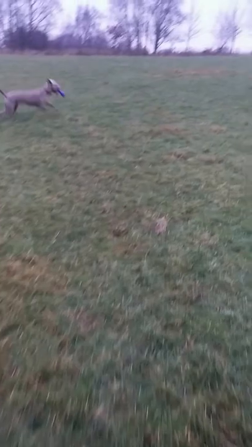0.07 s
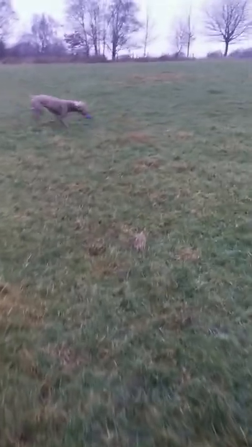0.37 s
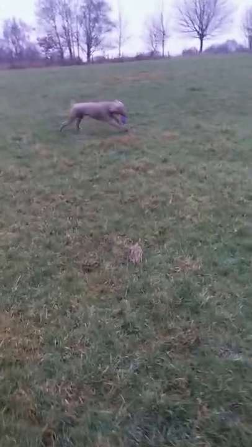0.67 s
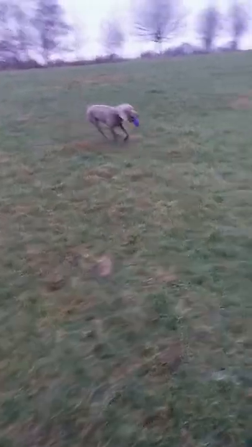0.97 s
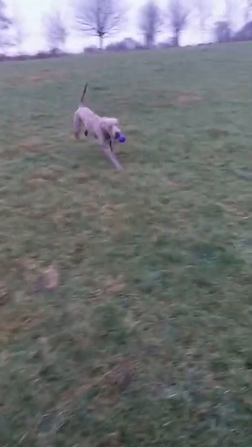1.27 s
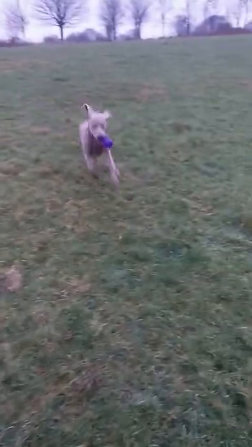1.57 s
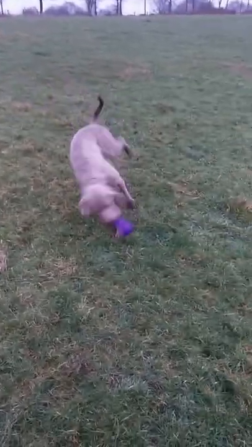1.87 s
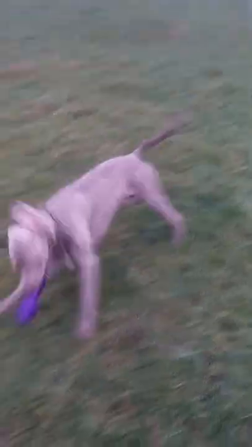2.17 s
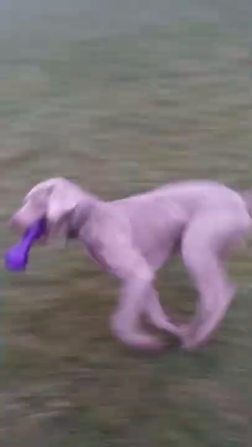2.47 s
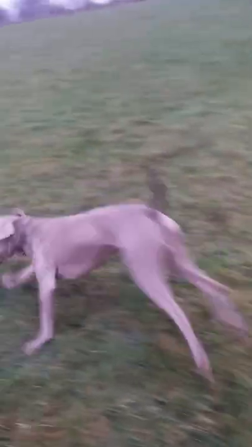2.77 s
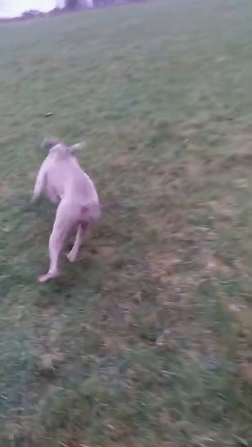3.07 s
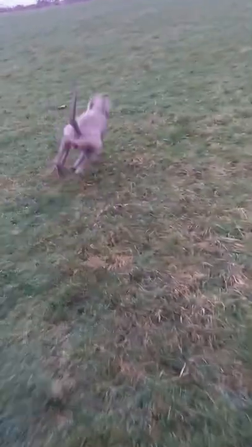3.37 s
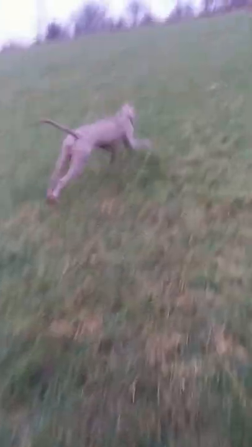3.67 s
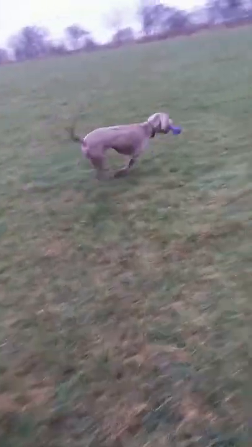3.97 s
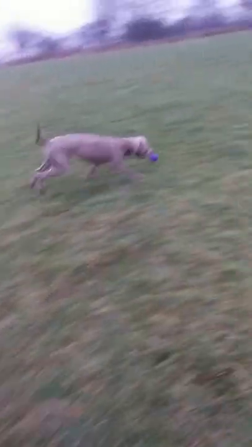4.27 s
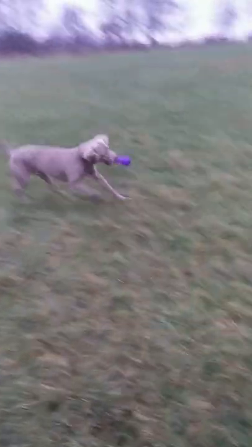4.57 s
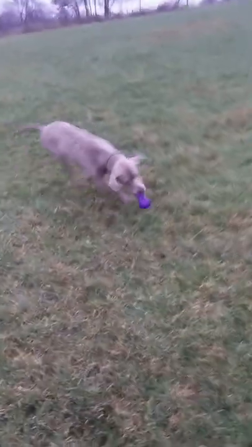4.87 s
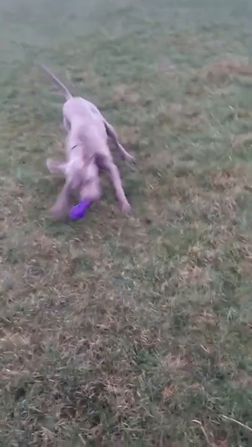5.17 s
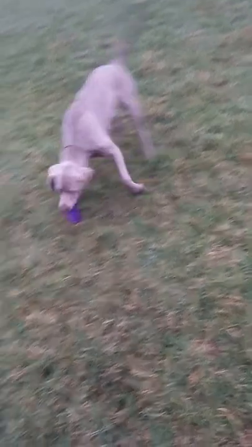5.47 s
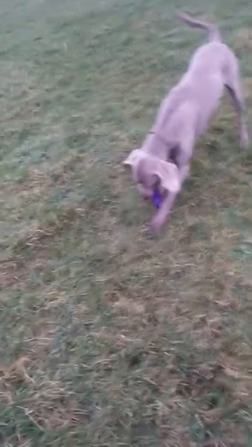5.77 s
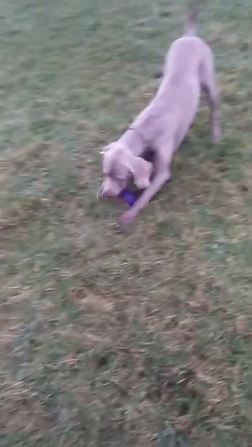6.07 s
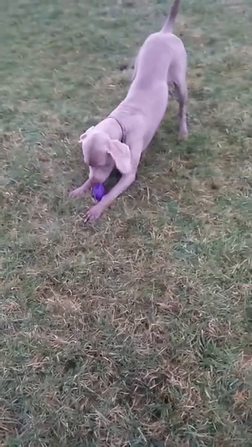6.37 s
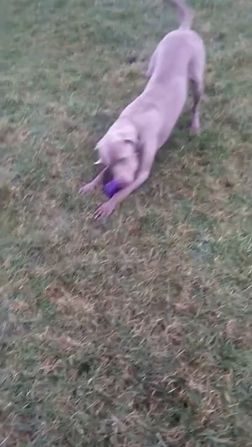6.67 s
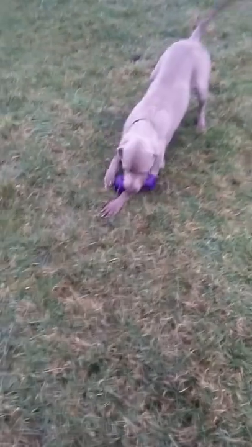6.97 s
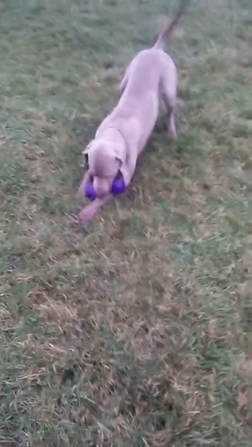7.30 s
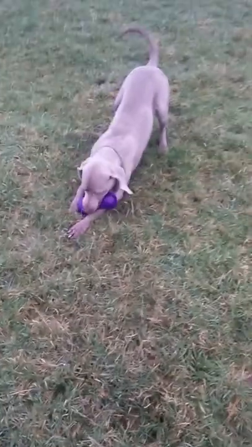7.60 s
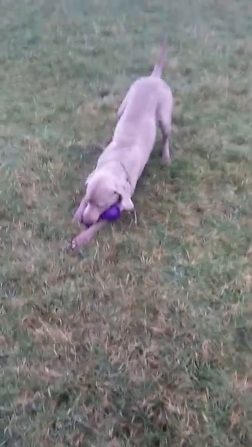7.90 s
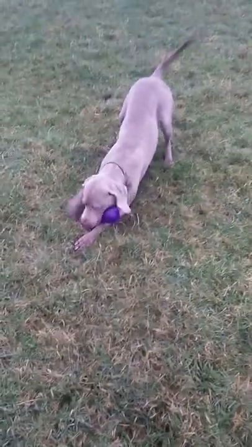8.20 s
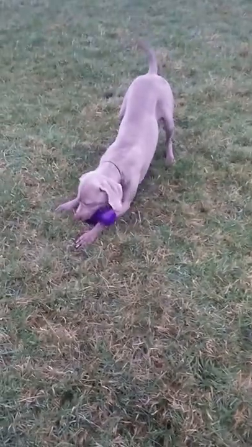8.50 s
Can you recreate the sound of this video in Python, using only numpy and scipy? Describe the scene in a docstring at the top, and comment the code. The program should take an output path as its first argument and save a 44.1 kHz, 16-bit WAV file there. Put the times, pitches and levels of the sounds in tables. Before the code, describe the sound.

A dog bites a rubber toy in rapid, shrill squeaks, with one short pause, over faint grass rustle and wind thumps.

```python
"""Dog with a squeaky toy

A dog gallops over a grassy field with a rubber toy in its jaws, then lies down and chews it.
Each bite drives air through the toy's reed and each release sucks it back; the pitch rides the flow.
Grass swishes underfoot and gusts buffet the two ports of a hand-held microphone."""
import sys
import numpy as np
from scipy import signal
from scipy.fft import rfft, irfft, next_fast_len
from scipy.io import wavfile
from scipy.ndimage import uniform_filter1d

SR = 44100
rng = np.random.default_rng(int(sys.argv[2]) if len(sys.argv) > 2 else 0)


def dump(signal):
    """Clip the signal to [-1, 1] and save it as 16-bit WAV at the path in sys.argv[1]."""
    limited = np.clip(np.atleast_2d(signal).T, -1, 1)
    pcm = np.round(limited * 32767).astype(np.int16)
    wavfile.write(sys.argv[1], SR, pcm)


N = 381024
TIME = np.arange(N) / SR
CUTOFF_HZ = 15750

# slow pressure rumble on the microphone: freq_hz, relative_db
RUMBLE_SPECTRUM = [(22, -39), (35, -33.5), (55, 5), (90, 2), (130, -1), (200, -43.5), (320, -37.5),
                   (600, -65.5)]
# dull rustle of steps and clothing: freq_hz, relative_db
RUSTLE_SPECTRUM = [(100, 6.5), (300, -7), (550, -1.5), (900, 4), (1400, -4.5), (2200, -18.5), (4000, -21.5),
                   (8000, -19), (15000, -35.5)]
# tone colour that the toy radiates: freq_hz, gain_db
TOY_SPECTRUM = [(600, -37), (950, -13), (1120, -6), (1380, -19), (1750, -0.44), (2250, -5.5), (2900, -3.5),
                (3500, -5.5), (4100, -9.5), (5300, -9.5), (6300, -15), (7400, -22.5), (8800, -31),
                (10300, -18.5), (11500, -32.5), (12500, -53), (16000, -49.5)]
# air modes of the hollow toy: centre_hz, width_hz, lift_db
AIR_MODES = [(1558.5, 380, 5.5), (1836, 420, -0.5), (2245, 290, 5.5), (2638, 120, -5.5), (3172, 200, 5.5),
             (3439, 37, 4), (3786, 180, 9.5)]


def from_db(db):
    return 10 ** (np.asarray(db) / 20)


def rms_one(x):
    return x / np.sqrt(np.mean(x ** 2) + 1e-20)


def ease(x):
    """A smooth step from 0 to 1."""
    return np.sin(np.pi / 2 * np.clip(x, 0, 1)) ** 2


def swell(start, length):
    """A rounded burst of height 1."""
    return np.sin(np.pi * np.clip((TIME - start) / length, 0, 1))


def in_time(rows):
    """The columns of an automation curve, sample by sample."""
    times, *columns = np.transpose(rows)
    return [np.interp(TIME, times, column) for column in columns]


def at_hz(points, hz, column=1):
    """One column of a spectrum, read on a log-frequency axis."""
    table = np.array(points)
    return np.interp(np.log(hz + 1), np.log(table[:, 0]), table[:, column])


def pan(left_db):
    """Left and right gains, left_db apart, with a mean power of one."""
    gains = from_db(np.vstack([left_db, -left_db]) / 2)
    return gains / np.sqrt(np.mean(gains ** 2, axis=0))


def shaped(x, response):
    """Filters x by a response given as a function of Hz."""
    size = next_fast_len(N + SR // 2)
    return irfft(rfft(x, size) * response(np.fft.rfftfreq(size, 1 / SR)), size)[..., :N]


def noise(spectrum):
    """Coloured noise, unrelated in the two channels; rms 1."""
    return rms_one(shaped(rng.standard_normal((2, N)), lambda hz: from_db(at_hz(spectrum, hz))))


def drift(rate_hz):
    """A smooth random wander that rolls off above rate_hz; rms 1."""
    return rms_one(shaped(rng.standard_normal(N), lambda hz: np.exp(-(hz / rate_hz) ** 2)))


def resonate(x, hz, width_hz):
    """A resonance with gain 1 at its peak."""
    r = np.exp(-np.pi * width_hz / SR)
    feedback = [1, -2 * r * np.cos(2 * np.pi * hz / SR), r * r]
    return signal.lfilter(np.array([1, 0, -1]) * (1 - r * r) / 2, feedback, x + 1e-18)


def lull(start_s=6.33, end_s=7.26, fade_s=0.095, return_s=0.022, depth_db=-32):
    """The background drops away in the pause between squeaks, as a noise suppressor closes and reopens."""
    gate_closed = np.minimum((TIME - start_s) / fade_s, (end_s - TIME) / return_s)
    return from_db(depth_db * np.clip(gate_closed, 0, 1))


def wind(breeze_db=-52, eddy_db=-25, strong_db=-20, eddy_growth=2.3, lumps_db=8.5, roundness=0.45):
    """Breeze and gusts press lumpily on each port; strong gusts break into smaller, higher eddies."""
    # gusts on the ports: start_s, length_s, level_db, left_over_right_db
    gusts = [(1.922, 0.11, -37, 27), (2.937, 0.23, -21, 38), (3.166, .23, -18, 44), (4.183, .1, -42, 4),
             (4.715, 0.19, -34.5, 4), (4.881, 0.15, -22, 7.5), (5.012, 0.34, -27.5, -23),
             (5.249, 0.067, -24, -31), (5.818, .09, -36, 15), (5.96, 0.26, -24.5, 48),
             (6.176, .19, -32.5, 33), (7.274, 0.15, -37.5, 6), (7.823, 0.17, -34, 38),
             (7.985, 0.054, -25, 43), (8.121, 0.15, -29.5, 31), (8.423, 0.047, -31, 30)]
    # small eddies in a strong gust: freq_hz, relative_db
    eddy_spectrum = [(50, -27), (120, 14), (190, 14.5), (280, -5.5), (400, -23), (600, -38.5), (1200, -58)]
    push = from_db(breeze_db) * pan(left_db=2) * lull()
    for start, length, db, left_db in gusts:
        push = push + from_db(db) * pan(left_db) * swell(start, length) ** roundness
    rumble = push * noise(RUMBLE_SPECTRUM)
    eddies = from_db(eddy_db) * (push / from_db(strong_db)) ** eddy_growth * noise(eddy_spectrum)
    return (rumble + eddies) * from_db(lumps_db * np.tanh(drift(35)))


def grass(rustle_db=7, swish_db=14, sway_db=3.8, grain_db=3.0):
    """Steps and clothing rustle; blades of grass flick in small grains."""
    # movement over the field: time_s, dull_db, bright_db
    movement = [(0, -57, -66.5), (1.25, -60, -70.5), (2.6, -54, -56), (3.0, -55, -66.5), (3.6, -55.5, -66),
                (4.55, -59.5, -71), (4.85, -57.5, -62.5), (6.3, -57.5, -76.5), (7.3, -57.5, -69),
                (8.64, -56, -64.5)]
    # bright swish of the blades: freq_hz, relative_db
    swish_spectrum = [(800, -16), (2000, 0), (3500, 7), (6000, 5.5), (8500, 0.5), (10300, -3.5),
                      (12500, -11.5), (15500, -7)]
    dull_db, bright_db = in_time(movement)
    rustle = from_db(dull_db + rustle_db + sway_db * drift(9.6)) * noise(RUSTLE_SPECTRUM)
    rustle = rustle + 0.25 * rustle[::-1]  # the low rustle reaches both ports
    swish = from_db(bright_db + swish_db + grain_db * drift(300)) * noise(swish_spectrum)
    return (rustle + swish) * lull() * pan(left_db=4.5)


def handling_bumps(rustle_db=-14):
    """Dull pushes on the microphone, each with a little rustle."""
    # soft bumps in the pause between squeaks: start_s, length_s, level_db
    bumps = [(6.425, 0.039, -40.5), (6.546, 0.045, -39), (6.818, 0.093, -39.5), (6.955, 0.042, -42),
             (7.056, 0.027, -53), (7.101, .04, -55), (7.218, 0.025, -63)]
    push = sum(from_db(db) * np.sqrt(swell(start, length)) for start, length, db in bumps)
    thud = noise(RUMBLE_SPECTRUM) * pan(left_db=14)
    return push * (thud + from_db(rustle_db) * noise(RUSTLE_SPECTRUM))


def scuffs():
    """Short bursts of friction, each with one broad resonance."""
    # paws on turf, legs through grass, teeth on rubber: start_s, length_s, centre_hz, width_hz, level_db
    rubs = [(2.417, 0.053, 1260, 600, -29.5), (2.442, 0.0033, 3500, 6000, -30),
            (2.462, 0.068, 543, 196, -41), (2.888, 0.12, 7700, 8900, -51), (3.592, 0.098, 7050, 9000, -53),
            (6.46, 0.072, 506, 151.7, -47.5), (6.556, 0.033, 1180, 3000, -75),
            (6.764, 0.026, 4340, 468, -44.5), (7.189, 0.01, 490, 499, -57), (7.426, 0.07, 561, 251, -43),
            (7.718, 0.03, 546, 219, -45)]
    friction = rng.standard_normal(N)
    out = np.zeros(N)
    for start, length, hz, width, db in rubs:
        band = resonate(resonate(friction, hz, width), hz, width)
        out += from_db(db) * swell(start, length) * rms_one(band)
    return out * pan(left_db=4)


def near_echoes(tone, t, strength=0.33):
    """Reflections from the ground and nearby bodies beat against a glide, differently at each port."""
    delays_s = rng.uniform([.001, .003, .006], [.003, .006, .015]) + rng.normal(0, .0001, (2, 3))
    echoes = [sum(strength / np.sqrt(k + 1) * np.interp(t - delay, t, tone)
                  for k, delay in enumerate(port)) for port in delays_s]
    return tone + np.array(echoes)


def reed_catch(pitch, glide, falter_db=1.5, catch_db=-0.5, width_hz=130):
    """On a fast glide the reed catches at evenly spaced air modes and falters between them."""
    lowest_hz = AIR_MODES[0][0]
    spacing_hz = AIR_MODES[1][0] - lowest_hz
    detune_hz = pitch - lowest_hz
    ripple_db = falter_db * np.cos(2 * np.pi * detune_hz / spacing_hz)
    lowest_mode_db = catch_db * np.exp(-(detune_hz / width_hz) ** 2)
    return np.tanh(glide / 10) * (ripple_db + lowest_mode_db)


def reed_tone(pitch, rest_hz, level_db, slope_db, purity_db=0.66):
    """Harmonics coloured by the toy; blown hard, the reed swings freely and the tone grows purer."""
    order = np.arange(1, 14)[:, None]
    partial_hz = order * pitch
    octaves_up = np.log2(pitch / rest_hz)
    thinning_db = octaves_up * (purity_db * (order - 1) + .5 * np.log2(order))
    overtones_db = np.log2(order) * slope_db - thinning_db
    gain = from_db(level_db + overtones_db + at_hz(TOY_SPECTRUM, partial_hz)) * (partial_hz < CUTOFF_HZ)
    phase = 2 * np.pi * order * np.cumsum(pitch) / SR
    return np.sqrt(2) * np.sum(gain * np.sin(phase), axis=0)


def squeak(stroke, t, waver, rest_hz=977.6, dome=.15, rasp=0.082, cling=.9, cling_hz=150,
           speak_delay_s=.004, onset_s=.005, edge_db=-14.5, edge_s=0.012):
    """One stroke of air: the flow rises, holds and falls, and lifts the reed above its rest pitch."""
    start, end, rise_s, fall_s, hold_hz, lean, db, swell_db, pinch_db, slope_db = stroke
    along = 2 * (t - start) / (end - start) - 1
    squeeze = ease((t - start) / rise_s) * ease((end - t) / fall_s)
    flow = squeeze * (1 + lean * along - dome * along ** 2)
    log_pitch = np.log(rest_hz) + flow * np.log(hold_hz / rest_hz)
    # the faster the flow changes, the more unsteadily the reed beats
    glide = np.abs(np.gradient(log_pitch)) * SR
    pitch = np.exp(log_pitch + waver * (1 + rasp * glide))
    # the reed clings to each air mode that it passes, so a glide moves in small steps
    pitch = pitch - sum(cling * (pitch - hz) * np.exp(-((pitch - hz) / cling_hz) ** 2)
                        for hz, _, _ in AIR_MODES)
    inside_s = np.maximum(np.minimum(t - start - speak_delay_s, end - t), 0)
    level_db = db + swell_db * along / 2 + pinch_db * (1 - squeeze) + reed_catch(pitch, glide)
    level_db += edge_db * np.exp(-inside_s / edge_s)  # the reed is weak while it starts and stops
    return reed_tone(pitch, rest_hz, level_db, slope_db) * np.minimum(inside_s / onset_s, 1)


def cavity(x, ring_db=-14.5, ring_width_hz=38):
    """The toy's air modes colour the squeak; the boosted ones ring on after the reed has passed them."""
    x = x + sum((from_db(lift_db) - 1) * resonate(x, hz, width) for hz, width, lift_db in AIR_MODES)
    ring = sum(resonate(x, hz, ring_width_hz) for hz, _, lift_db in AIR_MODES if lift_db > 0)
    return x + from_db(ring_db) * ring


def squeaky_toy(jitter=.005, wobble=.009, flutter_db=3.0, hiss_db=-32, flare_s=.019):
    """All squeaks, wavering as the jaws shift, with the hiss of their air, rung through the cavity."""
    # bites and releases: start_s, end_s, rise_s, fall_s, pitch_hz, lean (flow tilt toward the end),
    # level_db, swell_db (start to end), pinch_db (rise and fall over the hold), slope_db_per_octave
    strokes = [(-.02, 0.17, 0.017, .1, 1720, 0.47, -32, -10.5, 1.5, -5.5),
               (0.148, .25, .07, 0.015, 1317, -0.088, -22, 21, 0, -13.5),
               (0.261, 0.363, 0.022, 0.054, 1206, 0, -35.5, -15.5, -9, -0.5),
               (0.367, 0.486, 0.042, 0.032, 1946, 0.042, -38.5, -1, -6, 3),
               (0.486, 0.714, 0.058, 0.05, 3243, 0.058, -31, 7.5, 7.5, -5),
               (0.73, 0.934, .11, 0.048, 3133, 0.1, -21, -1.5, -8.5, 2),
               (0.925, 1.195, 0.035, 0.063, 3460, -.045, -22, 9.5, -1.5, -5.5),
               (1.218, 1.377, 0.089, 0.041, 2597, -0.022, -22, 6.5, -5, 3.15),
               (1.363, 1.608, 0.094, 0.032, 3192, 0.07, -22, 12.5, 5.5, -3),
               (1.606, 1.742, .098, 0.036, 1147, -0.39, -25.5, 10.5, -3, 2.5),
               (1.744, 1.867, 0.057, 0.034, 3340, -0.05, -12.5, 5.5, -1.5, -5),
               (1.866, 1.994, 0.031, 0.059, 1208, 0.64, -18.5, -5, 2, -1),
               (1.991, 2.185, 0.061, 0.058, 3200, 0.023, -14.5, 1, 3.5, -5.5),
               (2.184, 2.366, .056, 0.064, 3693, .23, -8, -4.5, -2, -1.5),
               (2.362, 2.553, 0.052, 0.12, 3833, 0.048, -14, -0.5, 6, -4.5),
               (2.541, 2.702, 0.062, .062, 1446, 0.8, -10, 0.5, -3.5, -4.5),
               (2.692, 2.892, 0.017, 0.089, 1359, .77, -14.5, 7.5, -7.5, 0.2),
               (2.897, 3.129, 0.022, 0.004, 1101, .15, -21.5, -8.5, 4.5, -3.5),
               (3.075, 3.188, 0.075, 0.031, 1510, 0.13, -21.5, 4, 2, -8.5),
               (3.198, 3.421, .13, 0.035, 3860, -.2, -25.5, -5.5, 1.5, -5.5),
               (3.399, 3.677, 0.16, 0.06, 2494, 0.5, -32, 1.5, 1.5, -9),
               (3.681, 3.9, 0.13, 0.031, 3584, -0.055, -23, -2, -9.5, -2.5),
               (3.903, 4.16, .042, .045, 3836, 0.042, -31, 5, 7, -3),
               (4.163, 4.324, 0.06, 0.11, 3005, 0.51, -24.5, -1, -7, 2.5),
               (4.315, 4.551, 0.082, .1, 3120, -0.12, -25.5, 0.5, -1.5, -6),
               (4.554, 4.682, 0.11, 0.057, 1915, 0.2, -28.5, 4.5, 5, -0.5),
               (4.681, 4.832, 0.041, 0.057, 3664, 0.32, -21, -2, 5, -4.5),
               (4.837, 4.977, .065, 0.052, 1997, 0.28, -19.5, 2.5, -7.5, 1.5),
               (4.973, 5.135, 0.054, .003, 3930, 0.078, -15, 4, 1, -8),
               (5.115, 5.244, .003, .064, 3195, -0.11, -16, -7, 3.5, -4.5),
               (5.259, 5.425, .098, 0.047, 3285, -.25, -16, 5, -7, 0),
               (5.419, 5.744, 0.038, .22, 3866, 0.043, -25, 1, 4, -9.5),
               (5.774, 5.934, .13, 0.053, 1730, 0.56, -23.5, 5.5, 5, -5),
               (5.931, 6.152, 0.059, 0.093, 2790, -0.26, -25.5, -6.5, 6.5, -8.5),
               (6.11, 6.33, 0.013, 0.24, 1133, -1.03, -22.5, -17, -2.5, -8.5),
               (7.241, 7.428, 0.011, 0.056, 1161, 0.56, -24.5, -4, 1.5, 2),
               (7.424, 7.554, 0.051, 0.064, 2240, 0.07, -13, 3, 1.5, -4.5),
               (7.562, 7.695, 0.098, .062, 1558, -0.7, -25, -12.5, 3.5, 0.5),
               (7.692, 7.832, 0.057, .055, 2816, -0.17, -9.5, 3.5, 0, -6),
               (7.848, 7.991, 0.1, 0.073, 1878, -0.35, -21, -6.5, 10, -4.5),
               (7.991, 8.143, 0.046, 0.058, 3334, 0.14, -22, 7.5, 18, -6.5),
               (8.147, 8.25, 0.092, .011, 1588, .38, -10.5, -3, -3, -4),
               (8.271, 8.302, 0.0083, 0.035, 1380, -0.38, -12, 5, 2.5, -2),
               (8.295, 8.607, .064, .19, 3525, -0.026, -9, -7.5, -4.5, -8.5)]
    # brief accents, the reed snapping onto an air mode: start_s, lift_db
    flares = [(0.683, 4.5), (1.453, 5), (2.006, 4.5), (2.136, 6), (2.299, 6), (2.8, 6), (3.488, 8),
              (5.311, 8.5), (5.571, 5.5), (6.098, 10), (7.51, 7), (8.007, 9), (8.502, 3.5)]
    waver = jitter * drift(490) + wobble * drift(30)
    reed = np.zeros((2, N))
    for stroke in strokes:
        span = slice(max(int(stroke[0] * SR), 0), int(stroke[1] * SR))
        reed[:, span] += near_echoes(squeak(stroke, TIME[span], waver[span]), TIME[span])
    flare_db = sum(db * swell(start, flare_s) for start, db in flares)
    reed *= from_db(flare_db + flutter_db * drift(80))
    envelope = np.sqrt(np.abs(uniform_filter1d(reed ** 2, size=500)))
    hiss = from_db(hiss_db) * envelope * noise(TOY_SPECTRUM)
    return cavity(reed + hiss)


def open_air(x, scatter_db=-17, scatter_t60_s=0.028, far_db=-33, far_t60_s=0.22):
    """A short scatter from the turf nearby and a faint tail from the field."""
    t = TIME[:SR // 2]
    out = x
    for level_db, t60 in ((scatter_db, scatter_t60_s), (far_db, far_t60_s)):
        tail = rng.standard_normal((2, len(t))) * np.exp(-np.log(1000) * t / t60) * (t > .002)
        tail /= np.sqrt(np.sum(tail ** 2) / 2)
        out = out + from_db(level_db) * signal.fftconvolve(x, tail, axes=1)[:, :N]
    return out


def ground_notch(x, notch_hz=3100, width_hz=1500):
    """Close to the turf, the ground reflection cancels a band of the squeak and hollows it."""
    # the toy pinned to the turf between the paws: time_s, closeness (0-1)
    pinned = [(7.0, 0), (7.2, 1), (7.62, 0.99), (7.72, 0.56)]
    closeness, = in_time(pinned)
    return x - closeness * resonate(x, notch_hz, width_hz)


def mic_ports(hz):
    """The casing shades and delays the sound differently at each port."""
    # how the two ports hear the toy: freq_hz, left_over_right_db, left_lead_rad
    shading = [(1020, 4.5, 1.6), (1280, 12.5, 0.85), (1737, -7.5, 1.42), (2040, 5, 3.83), (2540, 6.5, 1.8),
               (3480, 13.5, 1.77), (3660, 2.5, 4.63), (4540, 21.5, 5.33), (5600, 6.5, 5.1),
               (6500, 19, 7.86), (7200, -3, 15), (9500, 5.5, 12.21), (11340, 3.5, 11.63)]
    lead = at_hz(shading, hz, column=2)
    return pan(at_hz(shading, hz)) * np.exp(.5j * np.array([lead, -lead]))


def scene(toy_db=-4.5):
    """The toy in the open air, with wind, grass, handling and scuffs around it."""
    toy = shaped(ground_notch(open_air(squeaky_toy())), mic_ports)
    return wind() + grass() + handling_bumps() + scuffs() + from_db(toy_db) * toy


def record(dry, low_cut_hz=47):
    """The microphone sheds its deepest rumble, flattens peaks at full scale and cuts the top."""
    dry = signal.sosfilt(signal.butter(4, low_cut_hz, "high", fs=SR, output="sos"), dry)
    limited = dry / (1 + dry ** 8) ** (1 / 8)
    return signal.sosfilt(signal.cheby2(16, 70, CUTOFF_HZ + 500, fs=SR, output="sos"), limited)


dry = scene()
out = record(dry)
dump(out)
```